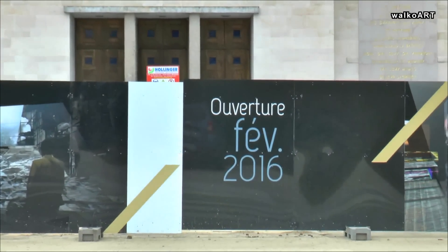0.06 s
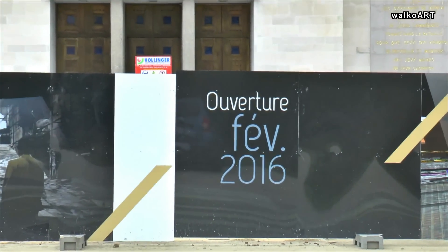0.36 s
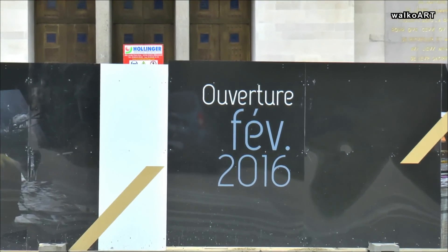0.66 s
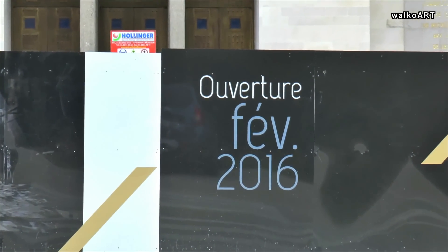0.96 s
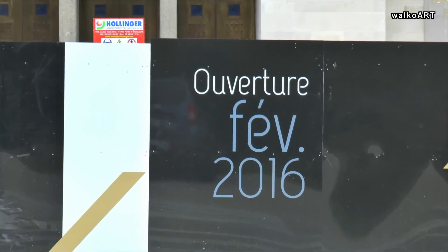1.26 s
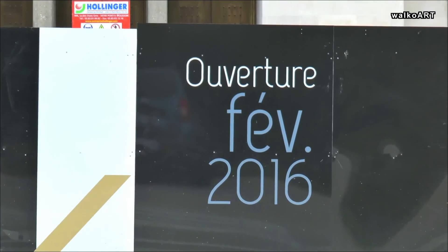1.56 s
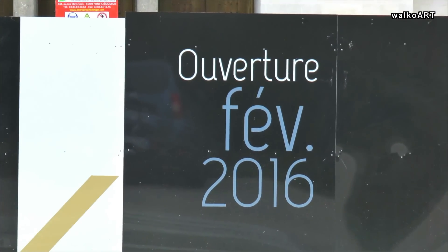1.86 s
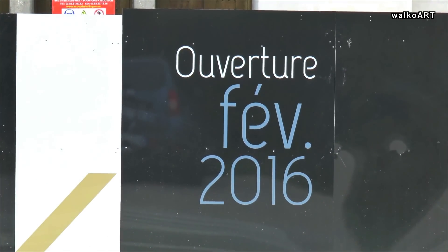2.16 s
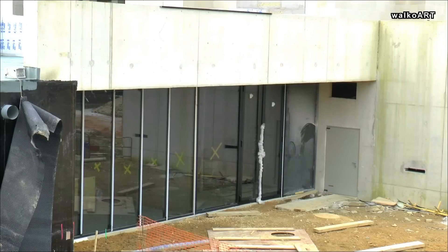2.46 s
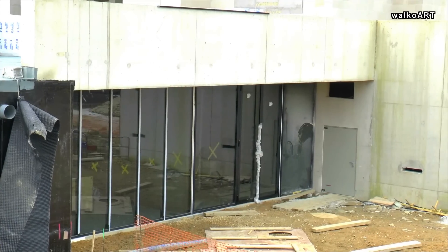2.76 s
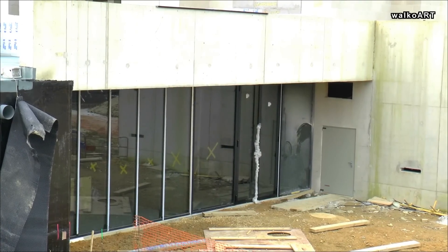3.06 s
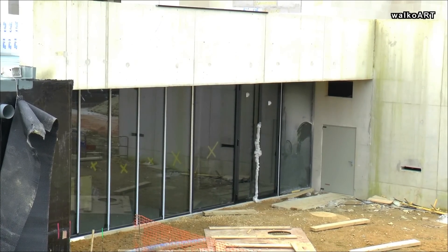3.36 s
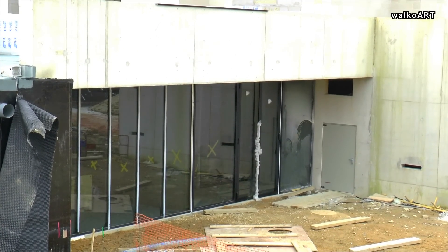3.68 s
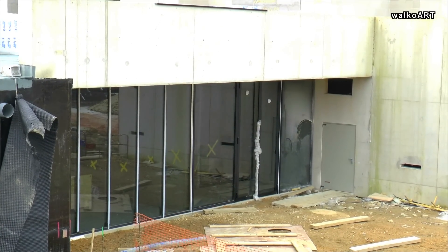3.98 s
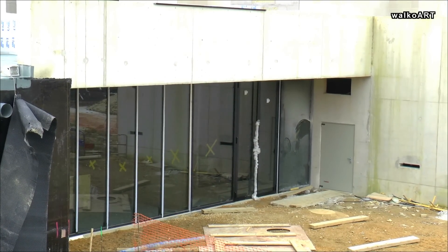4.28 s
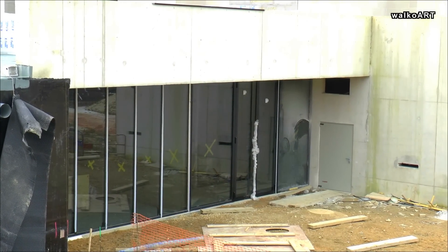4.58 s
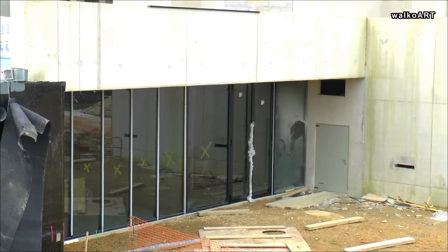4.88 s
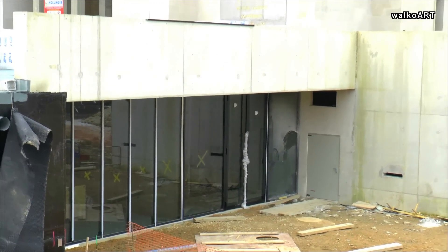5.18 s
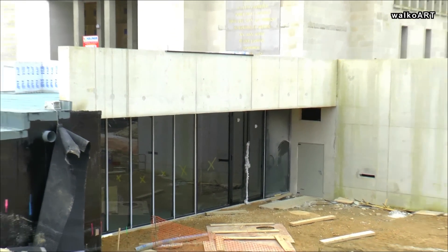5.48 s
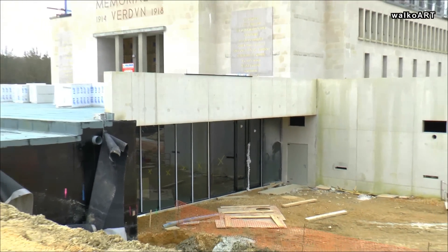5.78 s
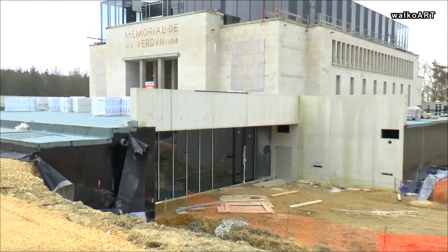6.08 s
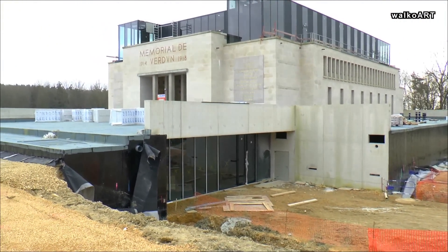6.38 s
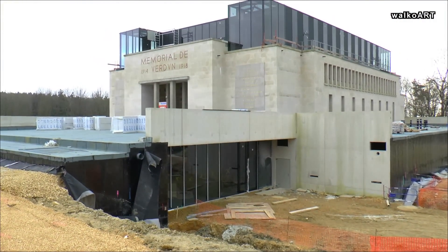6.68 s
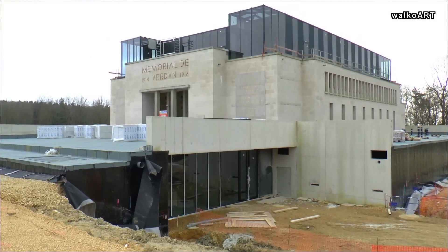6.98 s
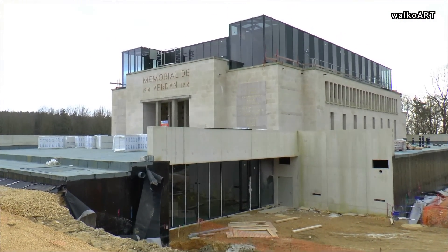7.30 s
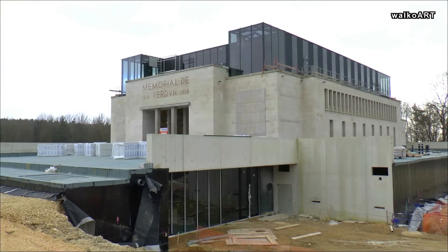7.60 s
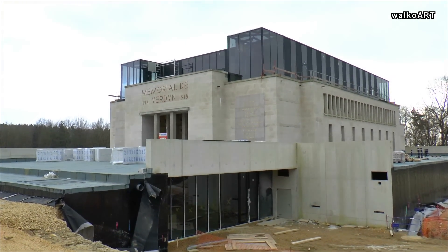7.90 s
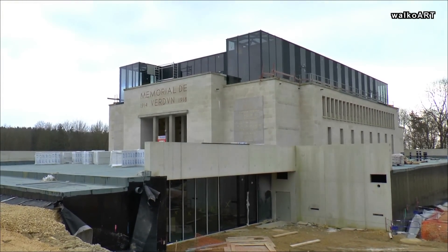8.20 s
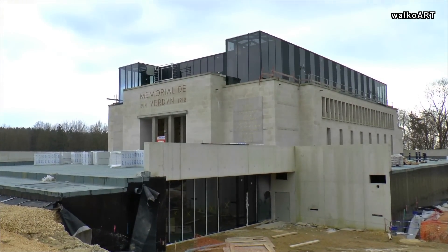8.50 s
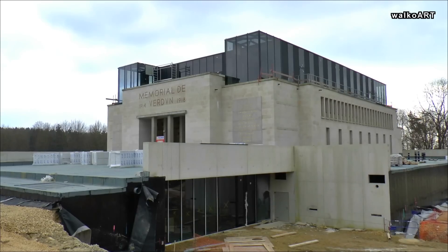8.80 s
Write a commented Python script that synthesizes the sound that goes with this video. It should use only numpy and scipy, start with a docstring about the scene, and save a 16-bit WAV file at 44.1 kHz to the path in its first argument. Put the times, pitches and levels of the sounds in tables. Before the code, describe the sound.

Low, fluttering wind hits an outdoor microphone in uneven gusts, with dull thumps and small handling ticks. After a sudden cut the air is almost still: a vehicle drives away with a fading drone and tyre rush, while small birds chirp and trill quietly, blurred by echoes from walls and trees. The engine hum drops out, and gentler gusts nudge the microphone again over the soft rush of a nearby wood.

```python
"""A building site by a wood, in two scenes joined by a hard cut. In the first, gusts buffet the
microphone with rumble, flutter and the thumps of single eddies. In the second, a vehicle's tyre noise,
exhaust drone and engine hum recede into the rush of the trees, and light puffs of wind return.
Small birds whistle all around, blurred by echoes off walls and trunks. Tiny slips on the camera's
housing give a brief scrape and a few ticks. A faint hiss and the camera's thin whine lie underneath."""
import sys
import numpy as np
from scipy import signal
from scipy.fft import rfft, irfft, next_fast_len
from scipy.io import wavfile
from scipy.ndimage import uniform_filter1d, map_coordinates

SR = 44100
rng = np.random.default_rng(int(sys.argv[2]) if len(sys.argv) > 2 else 0)


def to_wav(s):
    """Save 16-bit WAV."""
    ch = np.atleast_2d(s).T  # columns
    pcm = np.round(np.clip(ch, -1, 1) * 32767)  # PCM
    wavfile.write(sys.argv[1], SR, pcm.astype(np.int16))


N = 390285

# Levels in the event tables and spectra are relative: each layer sets its own gain.
# gusts on the microphone: crest t/s, level/dB, length/s within 10 dB of the crest (sign ignored)
GUST_CUES = [(0, -55.5, 0.39), (0.436, -46.5, 0.09), (0.611, -39, 0.1555), (0.858, -36.5, 0.4159),
             (1.116, -39.5, 0.29), (1.274, -35.5, 0.2913), (1.447, -34.5, 0.43), (1.641, -39, 0.12),
             (1.835, -40.5, 0.274), (2.02, -37, 0.173), (2.341, -35.5, 0.49), (6.209, -57, 0.0165),
             (6.327, -55.5, -0.19), (6.755, -60, .29), (6.984, -44.5, -0.1441), (7.255, -49.5, 0.13),
             (7.311, -45, 0.1465), (7.559, -50, 0.0848), (7.996, -48.5, .15), (8.183, -46.5, 0.1483),
             (8.338, -48.5, 0.41), (8.704, -49, 0.15)]
# thumps of single eddies: t/s, peak level/dB, length/s
EDDY_CUES = [(1.424, -18, 0.00279), (1.471, -24, .005), (1.516, -25.5, 0.0035), (1.651, -25, 0.00309),
             (2.354, -20.5, 0.0041), (2.482, -32, 0.0044), (6.327, -42.5, 0.0087), (6.957, -34, 0.0039),
             (6.972, -31.5, 0.00372), (7.313, -35, 0.00345)]
# spectra of the wind's three layers, dark to bright: f/Hz, level/dB
RUMBLE_EQ = [(12, -38), (25, -17), (45, -7.5), (95, -1), (150, -3), (250, -11), (400, -24), (700, -45),
             (1500, -80), (3000, -120)]
FLUTTER_EQ = [(60, -75), (150, -4), (290, 1), (400, -7), (600, -13), (850, -21.5), (1300, -35.5),
              (2500, -40.5), (6000, -72)]
RASP_EQ = [(300, -30), (600, -2), (900, 10.5), (1500, 4.5), (2500, -15.5), (4000, -28.5), (9000, -53.5)]
# spectra of the tyres' roar, the tread's hiss and the exhaust's drone: f/Hz, level/dB
TYRE_EQ = [(30, -36.5), (130, -5), (260, 9.5), (500, 0.5), (1000, 4), (1600, 7.5), (2300, -1.5),
           (3300, -7.5), (4500, -14.5), (7000, -29), (14000, -58)]
TREAD_EQ = [(1500, -30.5), (2600, -2.5), (3300, 6.5), (4200, -9), (6500, -17), (12000, -44)]
DRONE_EQ = [(25, -32.5), (70, -13.5), (130, -3), (220, 1), (320, -5), (550, -8.5), (1200, -12),
            (4000, -53.5)]
# single bird notes: t/s, length/s, f/Hz, glide/octaves, level/dB
BIRD_NOTES = [(0.977, 0.0297, 7630, 0.077, -67), (1.832, 0.0205, 7870, -0.13, -71),
              (2.003, 0.0487, 7970, .03, -65.5), (2.653, 0.069, 6080, 0.0014, -69.5),
              (2.772, 0.045, 6970, 0.014, -75.5), (2.831, 0.039, 5446, -0.133, -66.5),
              (2.911, 0.064, 4920, 0.078, -61.5), (3.046, 0.0607, 3977, 0.21, -56.5),
              (3.598, 0.024, 4903, 0.13, -64.5), (3.786, 0.0252, 4984, -0.18, -62),
              (3.934, 0.016, 4390, -0.337, -56.5), (4.514, 0.057, 4090, 0.24, -60),
              (4.61, 0.1026, 3192, 0.084, -56.5), (4.931, 0.03, 2887, 0.017, -59.5),
              (4.989, 0.019, 3034, 0.278, -55), (5.072, 0.0653, 4160, 0.21, -60.5),
              (5.172, 0.07, 3140, 0.063, -67), (5.957, 0.175, 4380, 0.015, -75),
              (8.687, 0.097, 8480, -.1, -73)]
# trills on one repeated note: first t/s, last t/s, note length/s, f/Hz, glide/octaves, level/dB
TRILLS = [(0.07, .445, 0.0414, 5355, -0.25, -70.5), (3.147, 3.475, 0.02046, 4070, 0.187, -61.5),
          (4.016, 4.239, 0.02516, 3324, 0.348, -59), (4.225, 4.366, 0.063, 7126, -.17, -74),
          (4.48, 4.908, 0.044, 5476, -0.38, -64.5), (7.195, 7.741, 0.045, 5325, -0.35, -75)]
# number of notes in each trill
TRILL_COUNTS = [5, 5, 3, 2, 6, 7]
# patches of distant twitter: start t/s, end t/s, level/dB
TWITTER_CUES = [(4.227, 4.6, -71.5), (4.598, 5.13, -65.5), (5.132, 5.3, -74), (6.717, 7.05, -76.5)]
# ticks and scrapes on the housing: t/s, level/dB, build-up/s
SLIP_CUES = [(0.361, -61.5, 0.0078), (0.384, -62.5, 0.016), (1.175, -61.5, 0.0079), (1.911, -54.5, 0.00098),
             (1.9352, -47.5, 0.0099), (1.942, -44, 0.0024), (1.9593, -48.5, .0005), (2.472, -50, 0.0016),
             (4.8794, -48, 0.00047), (5.032, -55.5, .001), (5.114, -57.5, 0.0026), (7.158, -62, 0.0033),
             (8.278, -61.5, 0.00132)]
# spectra of the trees, the plastic shell and the background hiss: f/Hz, level/dB
TREE_EQ = [(20, -12.5), (60, 2), (130, -4), (230, 1), (400, -7), (750, -5), (1100, -4.5), (1900, -11),
           (3300, -17), (4500, -28), (7000, -76), (15000, -64.5)]
SHELL_EQ = [(400, -29), (1500, -7), (3000, -3), (3900, -3), (4450, 2.5), (5200, -5.5), (6400, -7),
            (7600, -20), (10000, -18), (15000, -30.5)]
HISS_EQ = [(100, -1.5), (5000, 3), (7500, -4), (8800, -3), (9300, 1), (12200, 1), (14000, -3.5),
           (15700, -11)]
# fader rides for the trees and the background hiss: t/s, level/dB
TREE_FADER = [(0, -64), (1.6, -63.5), (2.5, -59), (5.5, -60), (7, -59.5), (8.85, -60.5)]
HISS_FADER = [(0, -73.5), (2.45, -70.5), (2.55, -74), (8.85, -76)]
# tones of the camera's whine: f/Hz, level/dB
WHINE_TONES = [(3248, -88), (4344, -98), (4800, -100), (6300, -100), (6900, -95.5), (12300, -101)]
# stereo image of wind and airborne sound: f/Hz, left-right coherence (1 = mono, 0 = wide)
WIND_IMAGE = [(40, .88), (100, .68), (200, .44), (400, -.05), (800, -.1)]
AIR_IMAGE = [(80, 0.84), (250, 0.903), (800, 0.894), (2000, 0.947), (4000, .96), (10000, 1)]
# faint background hiss, nearly mono, wider in a band near 8.5 kHz: f/Hz, left-right coherence
HISS_COHERENCE = [(3000, 0.988), (6000, 1), (8500, 0.336), (9400, 1)]
# narrow bands cancelled by reflections at the camera body: f/Hz, width/Hz, level/dB
BODY_NOTCHES = [(241.5, 17, -0.5), (497.6, 30.7, -6), (643.4, 43, -5.5), (895.2, 70.2, -6.5),
                (1020.1, 62, -5.5), (1167, 58.4, -7.5), (1297.3, 55.1, -9.5), (1567.3, 79.2, -8.5)]

CUT_S, TOP_HZ = 2.4817, 15720
BREEZE_DB, LULL_DB, LULL_END_S = -66, -81.5, 6.2  # the air is almost still for a while after the cut
PASS_S, PASS_DISTANCE_M, SPEED_M_PER_S = 2.48, 6.65, 12.08  # the vehicle's closest approach
TYRE_DB, TREAD_DB, DRONE_DB, HUM_DB = -52.5, -63.5, -55, -64.5  # at the closest approach
FADE_S, FADE_LENGTH_S = 5.053, 0.61  # the hum drops out of earshot and the tyres duck
TIME = np.arange(N) / SR


def buffeting():
    """Turbulence at the microphone: the harder the gust, the more small eddies flutter over the rumble."""
    force_db = wind_force()
    lumps = unit(amp(1.3 * wobble(45)))
    rumble = amp(force_db + 0.65) * rush(RUMBLE_EQ, WIND_IMAGE, patchy_db=-1.03)
    flutter = amp(-43.5 + 1.994 * (force_db + 36.5)) * rush(FLUTTER_EQ, WIND_IMAGE, patchy_db=2.0)
    crest_db = -54 - 170 * np.abs(TIME - 1.43)  # only the crest of the strongest gust rasps
    rasp = amp(crest_db) * rush(RASP_EQ, WIND_IMAGE, patchy_db=-0.5)
    return lumps * (rumble + flutter + rasp)


def wind_force(rise_share=0.501, roundness=1.296):
    """The wind's envelope in dB: gusts swell and die over a light breeze, each within its own scene."""
    t = np.arange(0, N / SR, .002)
    power = amp(np.where((t > CUT_S) & (t < LULL_END_S), LULL_DB, BREEZE_DB)) ** 2
    for s, db, length in GUST_CUES:
        from_crest = np.maximum((s - t) / rise_share, (t - s) / (1 - rise_share)) / abs(length)
        same_scene = (t < CUT_S) == (s < CUT_S)
        power += amp(db - 10 * from_crest ** roundness) ** 2 * same_scene
    return np.interp(TIME, t, 10 * np.log10(power))


def eddies():
    """Each eddy thumps with one push and pull of pressure, a little different at the two mic ports."""
    out, t = np.zeros((2, N)), np.arange(-SR // 20, SR // 20) / SR
    for s, db, length in EDDY_CUES:
        u = 2 * t / length
        same_scene = (s + t < CUT_S) == (s < CUT_S)  # the cut chops an eddy off with a click
        thump = (1 - 2 * u ** 2) * np.exp(-u ** 2) * same_scene
        for port in out:
            add(port, s - 1 / 20, amp(db + rng.normal(-1, 1.2)) * thump)
    return out


def vehicle():
    """Driving off: tread hiss dies first; tyre roar and drone recede slowly; hum holds, then drops out."""
    loss_db = 20 * np.log10(np.hypot(1, SPEED_M_PER_S * (TIME - PASS_S) / PASS_DISTANCE_M))
    fade = np.clip((TIME - FADE_S) / FADE_LENGTH_S, 0, 1)
    pan_left = amp([[1.1], [-1.1]])
    tyres = amp(TYRE_DB - loss_db - 6 * fade) * rush(TYRE_EQ, AIR_IMAGE, patchy_db=1.0) * pan_left
    tread = amp(TREAD_DB - 2.34 * loss_db) * rush(TREAD_EQ, AIR_IMAGE, patchy_db=-0.5)
    drone = amp(DRONE_DB - 0.567 * loss_db) * rush(DRONE_EQ, AIR_IMAGE, patchy_db=0.5)
    firing_hz = 91.5 + 1.216 * wobble(12)
    hum_db = HUM_DB - 0.067 * loss_db - 33.5 * fade + 0.46 * wobble(4.3)
    hum = amp(hum_db) * unit(np.sin(2 * np.pi * np.cumsum(firing_hz) / SR))
    return (TIME >= CUT_S) * (tyres + tread + drone + hum)


def birds():
    """Notes and even trills, blurred by the site's echo; the far twitter is fully wet."""
    song, twitter = np.zeros((2, N))
    for s, length, hz, glide, db in BIRD_NOTES:
        add(song, s, amp(db) * whistle(length, hz, glide))
    for (first, last, length, hz, glide, db), count in zip(TRILLS, TRILL_COUNTS):
        for u in np.linspace(0, 1, count):
            swell = amp(db - 1.5 * (2 * u - 1) ** 2)  # a trill is softer at its ends
            add(song, first + u * (last - first), swell * whistle(length, hz, glide, waver=0.0072))
    for start, end, db in TWITTER_CUES:
        for s in np.arange(start, end, .03):
            hz = rng.uniform(3119, 4800)
            onset = s + rng.normal(0, 0.0062)
            add(twitter, onset, amp(db + rng.normal(-1, 1)) * whistle(0.0193, hz, glide=0.4877))
    near = song + amp(-3) * echoes(song, t60=.45)
    return amp(-8) * near + echoes(twitter, t60=0.125)


def whistle(length, middle_hz, glide, waver=0.00465, rasp=0.048):
    """One bird note: a gliding sine; the shortest notes break up into raspy chips."""
    u = np.linspace(0, 1, int(length * SR))
    scoop = 0.214 * max(glide, 0) * (2 * u - 1) ** 2  # rising notes scoop up from below
    pitch_drift, level_drift = (map_coordinates(k, [u * 15]) for k in rng.standard_normal((2, 16)))
    jitter = waver + rasp * np.exp(-(length / .03) ** 4)
    hz = middle_hz * 2 ** (glide * (u - .5) - scoop) * (1 + jitter * pitch_drift)
    envelope = np.abs(np.sin(np.pi * u)) ** 1.21 * amp(0.34 * level_drift)
    return unit(envelope * np.sin(2 * np.pi * np.cumsum(hz) / SR))


def echoes(x, t60):
    """Walls and trunks scatter a sound into a short tail with a narrow stereo image."""
    t = np.arange(SR // 2) / SR
    mid, side = rng.standard_normal((2, len(t))) * amp(-60 * t / t60)
    tail = np.array([mid + 0.12 * side, mid - 0.135 * side])
    return signal.fftconvolve(x[None], tail / np.linalg.norm(tail[0]), axes=1)[:, :N]


def housing(release_s=0.0015):
    """Tiny slips on the camera's plastic shell: each scratch builds up, then stops short."""
    slips, t = np.zeros(N), np.arange(-SR // 10, SR // 10) / SR
    for s, db, build_up in SLIP_CUES:
        envelope = np.exp(-np.maximum(-t / build_up, t / release_s))
        add(slips, s - 1 / 10, amp(db + 8) * envelope * rng.standard_normal(len(t)))
    return filtered(slips, lambda hz: amp(along(SHELL_EQ, hz)))


def trees():
    """The bed: the even rush of the far wood."""
    return amp(ride(TREE_FADER) + 0.184 * wobble(3.4)) * rush(TREE_EQ, AIR_IMAGE, patchy_db=0.0658)


def noise_floor():
    """A faint, nearly mono background hiss and the camera's thin whine."""
    whine = sum(amp(db) * np.sqrt(2) * np.sin(2 * np.pi * hz * TIME) for hz, db in WHINE_TONES)
    return whine + amp(ride(HISS_FADER)) * rush(HISS_EQ, HISS_COHERENCE, patchy_db=-1.37)


def rush(eq, image, patchy_db):
    """Shaped stereo noise of rms 1, textured by random patches of gain in time and frequency."""
    white = signal.stft(rng.standard_normal((2, N)), nperseg=512)[2]
    patches = uniform_filter1d(rng.standard_normal(white.shape[1:]), size=6, axis=0)
    patches = uniform_filter1d(patches, size=14, axis=1)
    pair = signal.istft(white * amp(patchy_db * unit(patches)), nperseg=512)[1][:, :N]
    width = lambda hz: np.arccos(np.clip(along(image, hz), -1, 1)) / 2
    mid, side = filtered(pair, lambda hz: amp(along(eq, hz)) * [np.cos(width(hz)), np.sin(width(hz))])
    return unit(np.array([mid + side, mid - side]))


def amp(db):
    """Decibels to gain."""
    return 10 ** (np.asarray(db) / 20)


def unit(x):
    """Scale to rms 1."""
    return x / np.sqrt(np.mean(x ** 2) + 1e-20)


def along(points, hz):
    """Read (f/Hz, value) points on a log frequency axis."""
    f, values = np.transpose(points)
    return np.interp(np.log(hz + 1), np.log(f + 1), values)


def ride(fader):
    """A fader's level in dB at every sample."""
    return np.interp(TIME, *np.transpose(fader))


def wobble(rate):
    """Smooth random modulation, rate knots a second."""
    return map_coordinates(rng.standard_normal(int(N * rate / SR) + 4), [TIME * rate])


def filtered(x, response):
    """Equalise x with a gain given as a function of frequency."""
    size = next_fast_len(N + SR // 2)
    return irfft(rfft(x, size) * response(np.fft.rfftfreq(size, 1 / SR)), size)[..., :N]


def add(track, s, sound):
    """Mix a sound into a track at s seconds."""
    part = track[max(round(s * SR), 0):][:len(sound)]
    part += sound[:len(part)]


def scene():
    """The mix that reaches the two microphone ports."""
    return buffeting() + eddies() + trees() + vehicle() + birds() + housing()


def record(dry):
    """The camera body colours the sound; the noise floor joins it and the very top is cut off."""
    colour = lambda f: amp(sum(db * np.exp(-((f - hz) / width) ** 2) for hz, width, db in BODY_NOTCHES))
    return filtered(filtered(dry, colour) + noise_floor(), lambda hz: hz < TOP_HZ)


dry = scene()
out = record(dry)
to_wav(out)
```